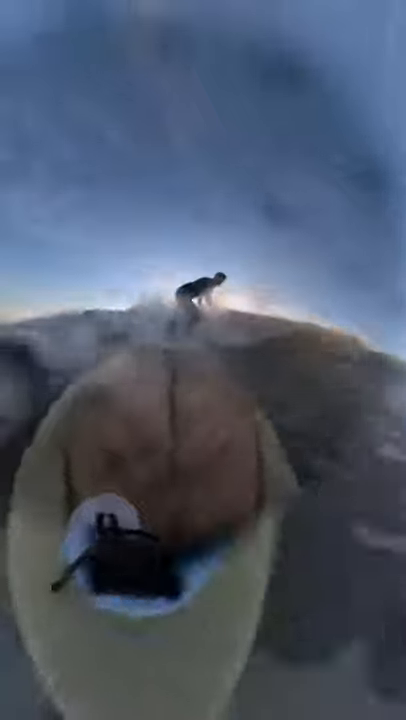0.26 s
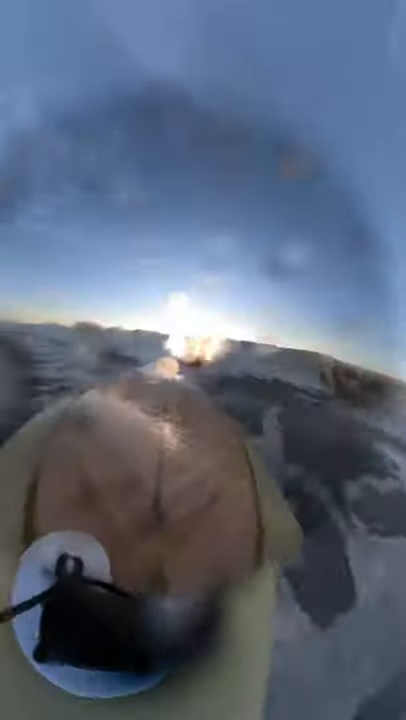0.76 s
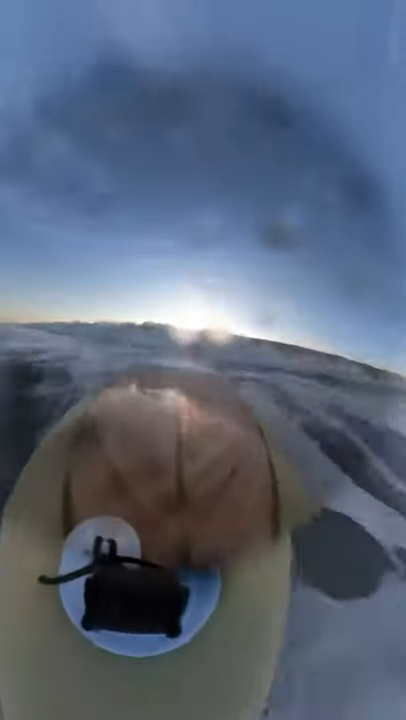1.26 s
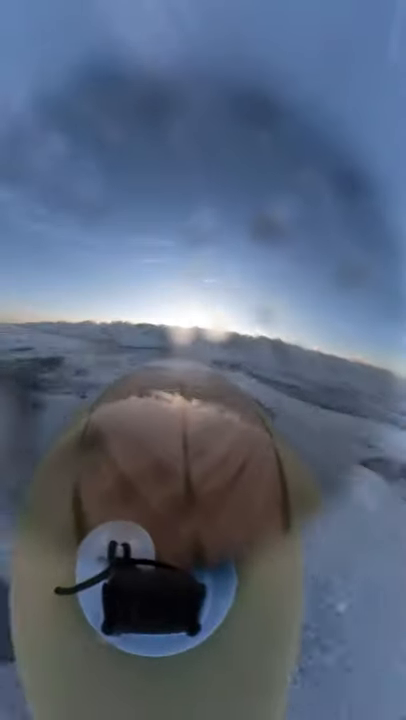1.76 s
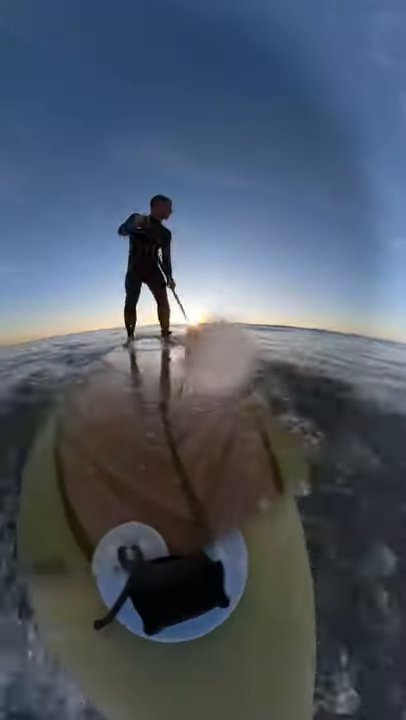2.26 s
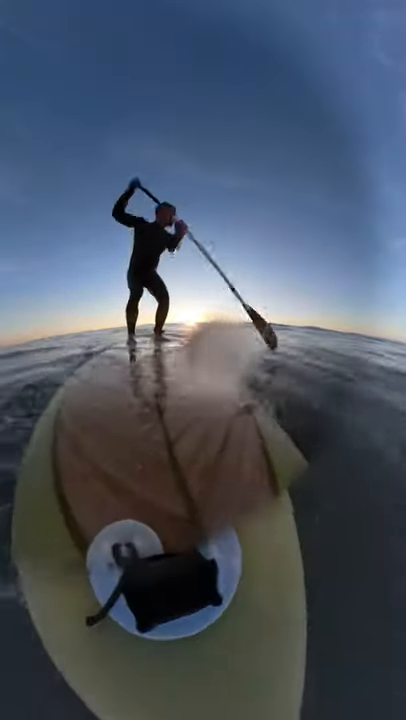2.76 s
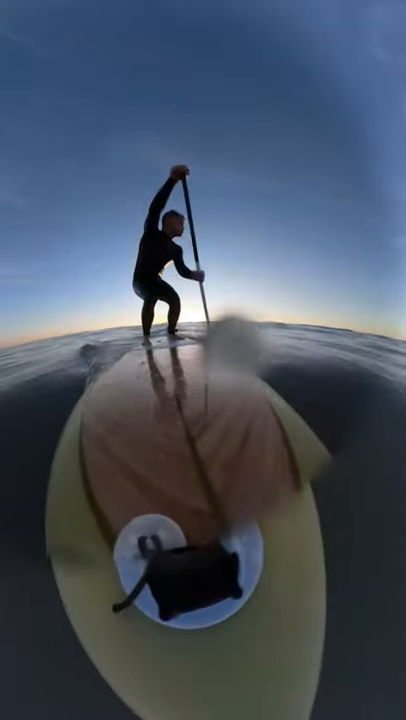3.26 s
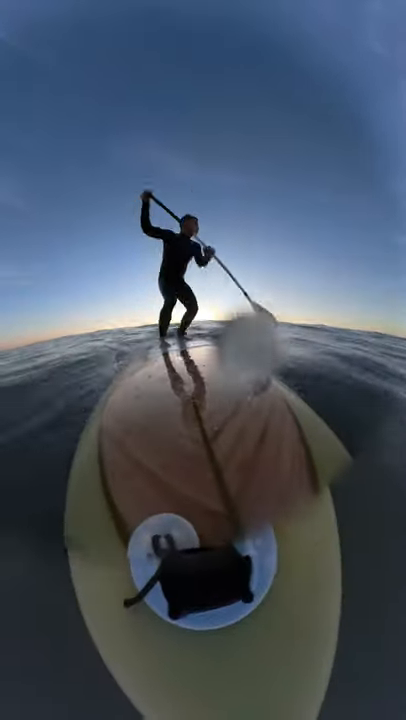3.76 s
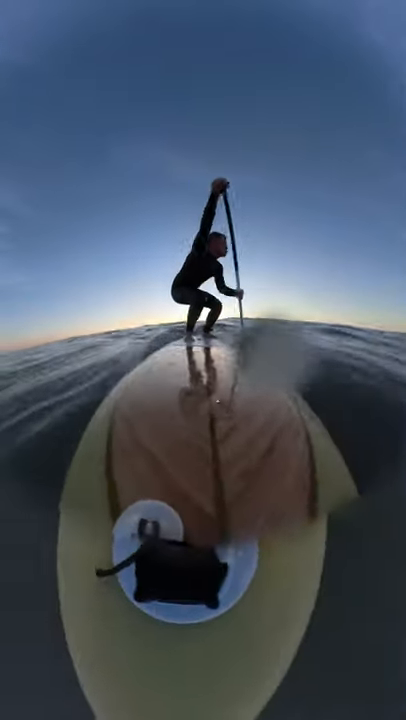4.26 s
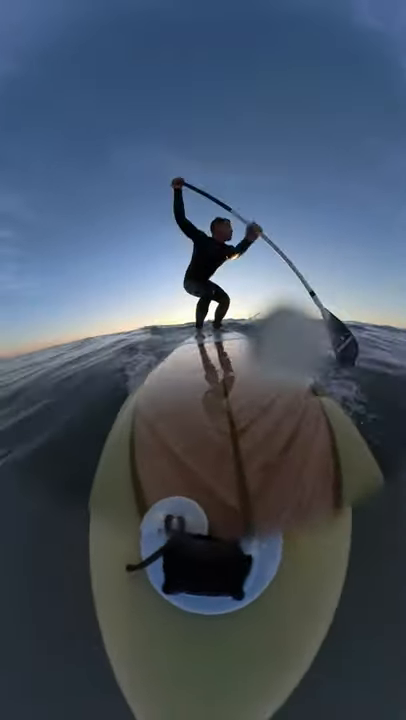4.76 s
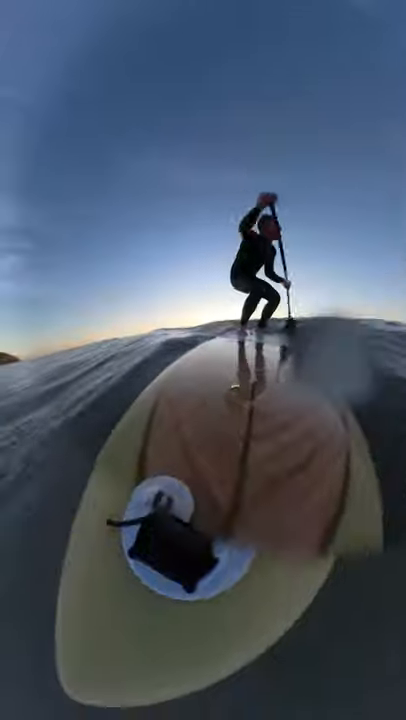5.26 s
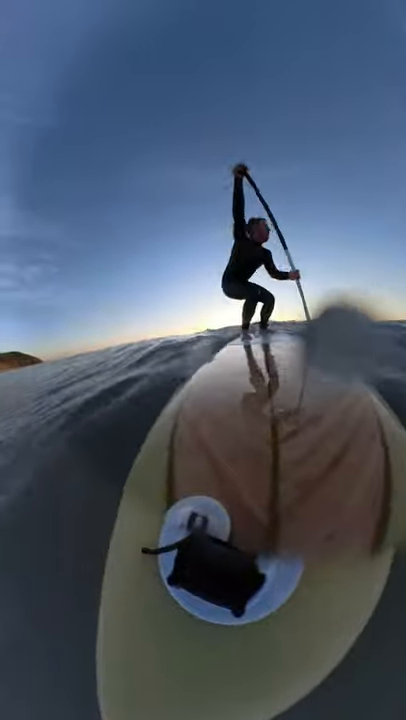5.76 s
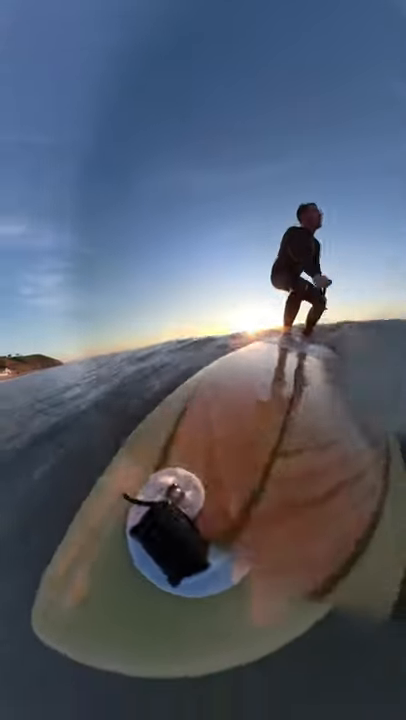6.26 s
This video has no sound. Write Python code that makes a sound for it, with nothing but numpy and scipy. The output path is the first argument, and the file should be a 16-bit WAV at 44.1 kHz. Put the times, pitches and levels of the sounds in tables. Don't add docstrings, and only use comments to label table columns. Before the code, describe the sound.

Outdoors on the sea, a sealed microphone sits on a paddle board's nose. From 0 to 2.2 s heavy low wind buffets and drums on the hollow hull, muffled by a water film, with dull knocks, gulping air pockets and rushing wash. Wet slaps with ringing drops come at about 0.87 and 1.1 s, then the water eases, with small laps near 1.7 and 2.05 s. At 2.18 s the sound falls nearly silent for a twentieth of a second, then opens with a click and a bright splash with hollow gulps; water drains hissing off the deck until about 2.8 s. Lighter wind follows, with irregular lapping, gurgles and drips, gusting around 3.7 and 4.6 s. A fuller wave surges at 5.24 s, wind strengthens, a deep gulp lands at 5.66 s, a sharp drop cracks at 5.83 s, and spray flurries from 6.14 s to the end. Distant breakers roar faintly throughout.

```python
import sys
import numpy as np
from scipy import signal
from scipy.fft import rfft, irfft, next_fast_len
from scipy.io import wavfile
from scipy.ndimage import uniform_filter1d, map_coordinates

SR = 44100
rng = np.random.default_rng(int(sys.argv[2]) if len(sys.argv) > 2 else 0)


def put_to_file(sound):
    columns = np.atleast_2d(sound).T
    safe = np.clip(columns, -1, 1)
    whole_steps = np.round(safe * 32767)
    wavfile.write(sys.argv[1], SR, whole_steps.astype(np.int16))


def invert_db(level):
    return 10 ** (np.asarray(level, dtype=float) / 20)


N = 286650
CUT_START_S, CUT_END_S = 2.1795, 2.2252


def unit(x):
    return x / np.sqrt(np.mean(x ** 2) + 1e-20)


def curves(rows):
    s, *columns = np.transpose(rows)
    return [np.interp(np.arange(N) / SR, s, column) for column in columns]


def wobble(rate_hz):
    knots = rng.standard_normal(int(N * rate_hz / SR) + 4)
    return map_coordinates(knots, [np.arange(N) * rate_hz / SR])


def filtered(x, response):
    size = next_fast_len(N + SR // 2)
    hz = np.fft.rfftfreq(size, 1 / SR)
    return irfft(rfft(x, size) * response(hz), size)[:N]


def colour(points):
    f, db = np.transpose(points)
    return lambda hz: invert_db(np.interp(np.log(hz + 1), np.log(f + 1), db))


def by_view(first, second):
    return np.where(np.arange(N) < (CUT_START_S + CUT_END_S) / 2 * SR, first, second)


def per_view(x, responses):
    first, second = (unit(filtered(x, r)) for r in responses)
    return by_view(first, second)


def swells(s, lift_db, length_s):
    step = 64
    t = np.arange(0, N + step, step) / SR
    since = t - s[:, None]
    width = np.where(since < 0, 0.52, 1) * np.abs(length_s)[:, None]
    bells = np.exp(-(since / width) ** 2)
    return np.interp(np.arange(N) / SR, t, lift_db @ bells)


def patchy(patchy_db):
    z = signal.stft(rng.standard_normal(N), nperseg=256)[2]
    field = uniform_filter1d(rng.standard_normal(z.shape), 4, 0)
    field = uniform_filter1d(field, 8, 1)
    return unit(signal.istft(z * invert_db(patchy_db * unit(field)), nperseg=256)[1][:N])


def bubbles(s, db, hz, cycles, rise, size):
    turns = np.arange(size) / SR * hz[:, None]
    life = turns / np.clip(cycles, .5, 40)[:, None]
    wave = np.sin(2 * np.pi * turns * (1 + rise * life))
    wave *= np.exp(-2 * life) * (1 - np.exp(-1.5 * turns)) ** 2
    wave *= np.cos(np.linspace(0, np.pi / 2, size))
    at = (s * SR).astype(int)[:, None] + np.arange(size)
    return np.bincount(at.ravel(), (invert_db(db)[:, None] * wave).ravel(), N + size)[:N]


def swarm(hz, octaves, cycles, spread_db, count, size):
    u, g = rng.random((count, 2)), rng.standard_normal(count)
    pitch = np.clip(hz * 2 ** (octaves * g), 80, 12000)
    db = -spread_db * np.log(1.004 - u[:, 1]) + 10 * np.log10(pitch / hz)
    return unit(bubbles(u[:, 0] * N / SR, db, pitch, np.full(count, cycles), rise=0.12, size=size))


def mix(noise, grains, share):
    share = np.clip(share, 0, 1)
    return np.sqrt(1 - share) * noise + np.sqrt(share) * grains


# frequency in Hz, level in dB per Hz.
SURF_COLOURS = [
    [(12, -36), (20, -12), (70, -7.5), (132, -0.5), (205, -6.5), (327, -0.5), (734, -22.5), (830, -22.5),
     (2560, -30.5), (7000, -82), (9100, -112), (15400, -120)],
    [(12, -33), (20, -3.5), (51, -10), (211, -12), (291, -13.5), (1170, -20), (1970, -27.5), (2170, -43.5),
     (5170, -60), (7500, -70), (9750, -102), (16500, -120)],
]


def surf():
    return invert_db(-42.5) * per_view(rng.standard_normal(N), map(colour, SURF_COLOURS))


# start in seconds, flow in dB, share thrown up as spray in dB.
FLOW_DRIFT = [(0.0, -36, -18), (0.44, -31, -22), (0.87, -37.5, -23), (1.31, -40, -22), (1.74, -38, -25.5),
              (2.18, -35, -20), (2.23, -29.5, -11.5), (2.62, -42.5, -26.5), (3.01, -41.5, -23.5),
              (3.39, -32.5, -20.5), (3.78, -36.5, -23.5), (4.17, -40, -16.5), (4.56, -37.5, -23),
              (4.95, -38, -21), (5.34, -44.5, -19), (5.72, -40.5, -24.5), (6.11, -38, -23),
              (6.5, -39, -25.5)]
# peak in seconds, lift in dB (negative in a lull),
# length in seconds, extra spray in dB.
WAVELETS = [(0.239, 6.0, 0.039, 7), (0.551, 0.5, 0.023, 6.5), (0.868, 5.5, 0.084, 6),
            (1.001, 4.5, 0.072, -0.5), (1.113, 10, 0.097, 5.5), (1.689, 7, 0.06, 3.7),
            (2.068, 4.5, 0.13, -1.7), (2.606, 7.5, 0.19, 2.5), (2.7, 5, 0.014, 4), (2.815, 4.3, 0.013, 7.3),
            (2.903, 4, 0.076, 3.5), (2.979, 8, 0.033, 3.5), (3.067, 5.5, 0.027, 8.5), (3.155, 0.5, 0.1, 9),
            (3.225, 7, 0.033, -2.6), (3.498, 3.5, 0.048, -1.5), (3.672, 2, 0.014, 3), (3.89, 2, 0.098, 5),
            (4.077, 6.5, 0.06, 1), (4.197, 6.5, 0.089, -4.2), (4.291, 4, 0.038, 0.5), (4.405, 4.5, 0.16, 3),
            (4.803, 4.5, 0.13, -2), (5.026, 4, 0.1, 2.5), (5.236, 12.5, 0.12, 2.7),
            (5.369, 5.5, 0.047, -4.5), (5.572, 1.5, 0.07, 4), (5.663, 0, 0.022, -4), (5.762, 7.5, 0.19, 8),
            (6.2, -2.5, 0.1, 6.5), (1.8, -2.5, .12, 2), (.3, -2.5, .04, 1), (.46, -2.5, .03, 1),
            (1.03, -2, .03, 1)]


def stream():
    usual_flow_db, usual_share_db = -35, -22
    flow_db, share_db = curves(FLOW_DRIFT)
    s, lift_db, length_s, extra_db = np.transpose(WAVELETS)
    flow_db = flow_db - usual_flow_db + swells(s, lift_db, length_s)
    return flow_db, share_db - usual_share_db + swells(s, extra_db, length_s)


# start in seconds, lift in dB
# (negative in a lull), length in seconds.
SPRAY_SLAPS = [(0.856, 7, 0.011), (.872, 11, 0.015), (1.109, 9.5, 0.029), (1.173, 6, 0.051),
               (2.252, 8.5, 0.019), (2.27, 11.5, 0.027), (2.342, 8.5, 0.017), (2.972, 9, 0.012),
               (3.144, 5.5, 0.019), (4.293, 1, 0.037), (4.356, 4.5, 0.021), (4.473, 6.5, 0.084),
               (6.137, 15.5, 0.021), (6.186, 8.5, 0.039), (6.27, 7.5, 0.023), (6.302, 10, 0.034),
               (6.338, 8, .012), (6.41, 8, 0.023), (3.295, 4, 0.08), (3.82, 3, .04), (1.68, 4.5, .025),
               (1.116, 0.5, .025), (2.225, -6, .02), (2.595, 10.5, 0.019), (2.382, 6, .012),
               (2.41, 4, .025), (2.436, -5, .035), (6.21, 4.5, .02), (6.245, -5, .025), (6.35, -4, .05),
               (1.195, 4.5, .035), (1.13, 2.5, .015), (2.515, -3.5, .04), (2.632, -4, .04), (2.74, -3, .05),
               (6.222, -2.5, .025), (3.53, 4, .07), (3.6, -4, .06), (3.92, 4, .04), (4.05, 3, .04),
               (5.84, 3, .06), (2.615, 4, .012)]


def slaps():
    s, db, length_s = np.transpose(SPRAY_SLAPS)[:, :, None]
    t = np.arange(SR // 5) / SR
    shape = db * (1 - np.exp(-t * 500)) * np.exp(-(t / length_s) ** 3)
    at = (s * SR).astype(int) + np.arange(len(t))
    return np.bincount(at.ravel(), shape.ravel(), N + SR)[:N]


LAYER_FOLLOWS = {"wash": (-34, -37, 1.225, -0.2051, -5.5), "rush": (-42, -43.5, 1.01, 0.14, 4),
                 "spray": (-57, -57, 0.8, 0.8754, -5), "mist": (-76, -68, 0.9, 0.55, 2.5)}


def layer_levels():
    drain_peak_s, drain_s = 2.434, 0.28
    flow_db, share_db = stream()
    since = np.arange(N) / SR - drain_peak_s
    draining = by_view(0, np.exp(-(since / drain_s) ** 2))
    return [by_view(first, second) + grow * flow_db + bright * share_db + drain_db * draining
            for first, second, grow, bright, drain_db in LAYER_FOLLOWS.values()]


# frequency in Hz, level in dB per Hz.
WASH_COLOURS = [
    [(71, -32), (120, -6.5), (236, -13), (478, -19), (525, -19), (900, -28.5), (1170, -49.5), (1980, -120)],
    [(71, -33), (120, 1.5), (188, -10.5), (286, -7), (314, -4), (900, -12), (1170, -40), (1980, -120)],
]
RUSH_COLOURS = [
    [(440, -29.5), (750, -7), (939, -5.5), (1090, -3), (1700, -12.5), (2300, -20.5), (2990, -39),
     (5060, -120)],
    [(440, -9), (750, -6.5), (944, -3), (1190, -2), (1920, -9), (2300, -30.5), (2990, -48), (5060, -120)],
]
SPRAY_COLOURS = [
    [(1120, -47.5), (1900, 0.5), (2660, 1), (3450, -13), (4400, -30.5), (5720, -56.5), (9680, -120)],
    [(1120, -33), (1900, -6), (1990, -5), (2160, -9), (2710, -7), (3200, -15), (4400, -24), (5720, -59),
     (9680, -120)],
]
MIST_COLOURS = [
    [(2290, -23), (3900, -2.5), (4350, -2.5), (5090, 4), (5830, -11), (6470, -11), (7720, -30),
     (10000, -70), (17000, -120)],
    [(2290, -28.5), (3900, -7.5), (4490, -10.5), (4930, -2), (5530, -4), (5880, -4.5), (7150, -23.5),
     (7720, -21.5), (10000, -48.5), (17000, -120)],
]


def water():
    wash_db, rush_db, spray_db, mist_db = layer_levels()
    lift_db = slaps()
    churn_db = .4 * wobble(14) + .85 * wobble(45) + .55 * wobble(130)
    gurgle = swarm(600, 1.2, 3.5, spread_db=2.5, count=5000, size=1000)
    prickle = swarm(4000, .7, 5, spread_db=3.2, count=9000, size=250)
    body = mix(patchy(patchy_db=.6), gurgle, share=.04)
    fizz = mix(patchy(patchy_db=.9), prickle, share=.15)
    out = invert_db(wash_db + 0.19 * lift_db) * per_view(invert_db(1.6 * churn_db) * body, map(colour, WASH_COLOURS))
    out += invert_db(rush_db + 0.52 * lift_db) * per_view(invert_db(0.48 * churn_db) * body, map(colour, RUSH_COLOURS))
    out += invert_db(spray_db + lift_db) * per_view(invert_db(0.72 * churn_db) * fizz, map(colour, SPRAY_COLOURS))
    return out + invert_db(mist_db + lift_db) * per_view(invert_db(1.4 * churn_db) * fizz, map(colour, MIST_COLOURS))


# start in seconds, peak in dB.
PINPRICKS = [(0.3121, -68), (0.3306, -67), (0.7866, -70), (0.9307, -72), (0.9547, -69), (1.2989, -76),
             (1.3173, -68), (1.3787, -76), (1.3947, -67), (2.3779, -80), (4.341, -77), (5.8196, -74),
             (5.8326, -62), (5.8454, -66), (5.872, -70), (5.8774, -71), (5.8824, -75), (6.1439, -70),
             (6.1768, -71), (6.2277, -68), (6.2866, -68)]
# frequency in Hz, level in dB per Hz.
PINPRICK_COLOUR = [(5500, -40), (7500, -3), (10500, 0), (13500, -4), (16000, -40)]


def pinpricks():
    s, db = np.transpose(PINPRICKS)
    clicks = np.bincount((s * SR).astype(int), invert_db(db + 5.0), N)[:N]
    burst = rng.standard_normal(90) * invert_db(-np.arange(90) / SR * 9000)
    return filtered(np.convolve(clicks, burst)[:N], colour(PINPRICK_COLOUR))


# start in seconds, peak in dB,
# pitch in Hz.
SINGLE_DROPS = [(.853, -42.5, 2790), (.888, -34.5, 3200), (1.112, -34, 3000), (1.118, -42, 2540),
                (1.127, -29, 3500), (1.685, -41, 2850), (2.2468, -40, 2420), (2.4264, -40, 2620),
                (2.4763, -47, 2420), (2.6803, -41, 2520), (2.809, -38.5, 2320), (2.9744, -40, 2770),
                (3.059, -42, 2720), (3.1428, -43, 2820), (3.444, -40, 2790), (3.6731, -41, 2740),
                (5.214, -32.5, 2650), (5.8326, -26, 2430), (6.1335, -43, 2690), (6.286, -41, 3370),
                (2.3067, -40, 4170), (2.3316, -45, 3950), (2.352, -42, 3400), (2.5735, -49, 3500),
                (2.6189, -49, 3000), (3.5874, -46, 3750), (3.8329, -47, 3560), (3.9247, -45, 4180),
                (4.4929, -46, 3730), (5.2028, -46, 3880), (5.75, -44, 4200), (6.2719, -43, 2650),
                (6.4071, -47, 2760), (5.872, -42, 2500), (1.2, -44, 3100),
                (.861, -42, 5130), (.866, -42, 4200), (.882, -42, 4300), (.877, -43.5, 5400),
                (1.1103, -49, 5570), (2.2248, -47.5, 4900), (2.2358, -46, 5400), (2.2533, -39, 5960),
                (2.4142, -38, 5250), (2.3875, -49, 5510), (2.385, -55, 7800), (2.3605, -51, 5800),
                (2.346, -58, 7000), (2.4275, -50, 4700), (2.5095, -52, 5240), (2.5655, -56, 5800),
                (2.332, -48, 5400), (5.0366, -50, 4940), (5.4357, -50, 5290), (4.6365, -55, 5010),
                (6.3115, -57, 6200), (6.187, -53, 5300), (3.538, -52, 6000), (2.5892, -49, 5700),
                (2.591, -53, 6400), (2.7204, -46, 6160), (2.8985, -50, 5030), (2.9662, -51, 4720),
                (2.9796, -49, 5040), (3.2131, -51, 4900), (3.229, -48, 4600), (3.2944, -49, 4730),
                (3.7135, -51, 4850), (4.0864, -47, 4750), (4.372, -55, 4830), (5.8233, -50, 5370),
                (5.8334, -32.5, 4900), (6.145, -42, 5470), (6.1715, -42, 5040)]


def drops():
    s, db, hz = np.transpose(SINGLE_DROPS)
    return invert_db(7.5) * bubbles(s, db, hz, 3.5 + 0.0011 * hz, rise=0.01, size=400)


# start in seconds, peak in dB, 60 dB decay time in seconds.
HARD_DROPS = [(2.2362, -31, 0.0037), (5.8342, -12, 0.00096), (6.146, -31, 0.004), (6.1716, -38, 0.0037),
              (2.387, -40, .005), (2.589, -40, .004), (5.823, -40, .005), (3.6702, -42, .004)]
# frequency in Hz, level in dB per Hz.
HOUSING_COLOUR = [(1180, -18), (2000, 1), (2250, -12), (3290, 2.5), (5110, -16.5), (6090, -29), (6740, -10),
                  (7720, -18.5), (10000, -53), (17000, -120)]


def snaps():
    cracks, t = np.zeros(N), np.arange(600) / SR
    for s, db, t60 in HARD_DROPS:
        decay = invert_db(db + 7.0 - 60 * t / t60)
        cracks[round(s * SR):][:len(t)] += decay * rng.standard_normal(len(t))
    return filtered(cracks, colour(HOUSING_COLOUR))


# start in seconds, peak in dB, pitch in Hz, life in cycles.
AIR_POCKETS = [(0.496, -24, 289, 5.6), (0.724, -19, 380, 4.6), (0.777, -15, 334, 2.1), (0.86, -19, 650, 5),
               (1.104, -9.5, 526, 5), (1.184, -19.5, 666, 10), (1.54, -20, 348, 3.8),
               (1.833, -22.5, 400, 7.8), (2.247, -8, 970, 4.8), (2.854, -27, 464, 6.9),
               (2.974, -26, 546, 4.1), (3.166, -24.5, 427, 9.7), (3.329, -20, 394, 6.4),
               (4.265, -21, 366, 3.4), (4.545, -22.5, 859, 9.5), (5.031, -15.5, 294, 3.3),
               (5.254, -17.5, 470, 9.1), (5.373, -18, 664, 3.5), (5.664, -10.5, 346, 2.8),
               (5.702, -22, 412, 4.1), (5.851, -18.5, 295, 9.1), (5.915, -13, 274, 4),
               (6.136, -17, 1090, 5.5), (.236, -17.5, 640, 7), (.406, -18.5, 780, 9), (.551, -18.5, 614, 7),
               (1.538, -21, 560, 4), (1.69, -19, 580, 6), (2.046, -20, 603, 4), (2.268, -14, 816, 5),
               (2.293, -15, 950, 4), (2.586, -20, 921, 5), (2.695, -19, 746, 4), (2.329, -19, 700, 5),
               (3.219, -17, 673, 5), (3.403, -18, 923, 4), (3.521, -21, 659, 4), (3.591, -19, 484, 4),
               (3.87, -20, 546, 4), (4.205, -17, 684, 4), (2.42, -25, 1500, 6), (4.462, -19, 589, 4),
               (4.725, -20, 711, 4), (5.739, -21, 571, 4), (2.35, -22, 1150, 6), (.872, -17, 720, 5)]


def gulps():
    return invert_db(0.5) * bubbles(*np.transpose(AIR_POCKETS), rise=0.0084, size=1500)


# start in seconds, peak in dB, pitch in Hz, life in cycles.
HULL_KNOCKS = [(.255, -22, 300, 6), (.4, -22, 420, 7), (.612, -22, 420, 5), (.665, -20, 250, 5),
               (.72, -22, 200, 4), (.775, -21, 170, 5), (3.484, -22, 365, 9), (3.68, -21, 140, 5),
               (4.04, -29, 160, 8), (4.365, -22, 190, 6), (4.41, -26, 205, 7), (4.475, -27, 200, 8),
               (5.655, -25, 150, 5), (1.39, -28, 450, 4), (5.93, -24, 380, 5), (6.03, -26, 400, 5),
               (1.62, -25, 300, 5)]


def thuds():
    return invert_db(5.5) * bubbles(*np.transpose(HULL_KNOCKS), rise=-.01, size=4000)


# peak in seconds, lift in dB, length in seconds.
GUSTS_AND_LULLS = [(0.098, -2, 0.032), (0.188, -8, 0.054), (0.32, -1, .066), (0.45, -12, .031),
                   (0.745, -4, 0.063), (0.862, 3, 0.026), (1.095, 4.5, .055), (1.397, 3, .03),
                   (1.514, -9, .19), (1.736, 1.5, 0.038), (2.063, 9, 0.026), (2.424, 4.5, 0.15),
                   (2.724, -8, 0.032), (2.898, -4, .06), (3.168, -5, .06), (3.415, 3, 0.047),
                   (3.593, 7, 0.034), (3.716, 8.5, 0.078), (4.036, -8, .055), (4.385, 1, .2),
                   (4.592, 9.5, .044), (4.71, 8, 0.032), (4.818, -8, 0.033), (5.067, 3, .054),
                   (5.13, -10, .037), (5.188, 6, 0.03), (5.323, -7.5, .054), (5.493, -8.5, 0.062),
                   (5.635, -13, 0.063), (6.268, -5, 0.027)]


def gusts():
    return swells(*np.transpose(GUSTS_AND_LULLS))


# peak in seconds, lift in dB, length in seconds.
HULL_BOOMS = [(.023, -12.5, 0.24), (.302, 9.5, 0.12), (.47, -6, 0.14), (.69, 2, 0.047), (.855, 7, .051),
              (1.093, 6, .086), (1.52, -9.5, 0.11), (1.753, 10.5, 0.16), (2.267, 8.5, .12),
              (3.68, 4.5, 0.022), (4.4, 2.5, 0.11), (4.658, -5.5, .2), (5.482, -9, 0.089),
              (5.614, -7, 0.035), (5.89, 4.5, 0.081), (6.163, -15, .14), (6.371, -1.5, 0.093)]


def hull_level(gust_db):
    t = np.arange(N) / SR
    drift_db = by_view(-26 - 2.5 * t, -39 + 1.82 * (t - CUT_END_S))
    return drift_db + swells(*np.transpose(HULL_BOOMS)) + .1 * gust_db + 0.3 * stream()[0]


# frequency in Hz, width in Hz.
HULL_MODES = [
    (50, 31),
    (190, 116),
]


def hull_drum(gust_db):
    modes = [lambda f, c=c, w=w: (1j * f * w / (c * c - f * f + 1j * f * w)) ** 2 for c, w in HULL_MODES]
    drum = per_view(rng.standard_normal(N), modes)
    drum /= uniform_filter1d(np.abs(drum), size=5000) ** 0.4
    return invert_db(hull_level(gust_db)) * unit(drum)


# time in seconds, level in dB.
WIND_STRENGTH = [(0, -26), (.44, -18), (.87, -20), (1.31, -21), (1.74, -25), (2.18, -28), (2.23, -37),
                 (2.62, -37.5), (3.01, -41.5), (3.39, -41), (3.78, -33), (4.17, -35), (4.75, -40.5),
                 (5.34, -26.5), (5.8, -27), (6.125, -32), (6.145, -17.5), (6.5, -23)]
# frequency in Hz, level in dB per Hz.
BUFFET_COLOURS = [
    [(8.8, -40), (15, -14), (38, 1.5), (54, -1), (120, -5.5), (166, -16), (220, -19.5), (290, -32.5),
     (480, -120)],
    [(8.8, -43.5), (15, -6.5), (32, 0), (47, 1.5), (108, -8.5), (135, -20), (150, -15), (200, -53.5),
     (330, -120)],
]


def buffeting(gust_db):
    swing = invert_db(2.3 * wobble(18)) * rng.standard_normal(N)
    swing = per_view(swing, map(colour, BUFFET_COLOURS))
    swing /= uniform_filter1d(np.abs(swing), size=3500) ** 0.93
    return invert_db(curves(WIND_STRENGTH)[0] + gust_db) * unit(swing)


def wind():
    top, knee = .4, 3.6
    gust_db = gusts()
    low = buffeting(gust_db) + hull_drum(gust_db)
    return low / (1 + np.abs(low / top) ** knee) ** (1 / knee)


# frequency in Hz, gain in dB.
MEMBRANE_GAIN = [(7600, 0), (9200, -12.5), (12000, -44)]


def membrane(x):
    return filtered(x, colour(MEMBRANE_GAIN))


def scene():
    splashes = drops() + snaps() + gulps() + thuds()
    return (membrane(surf() + water() + splashes + wind()) + pinpricks())[None]


def top_cut(x):
    return signal.sosfilt(signal.butter(12, 14200, fs=SR, output="sos"), x)


def record(dry):
    t = np.arange(N) / SR
    since = t - CUT_START_S
    first = np.clip(-since / .0008, 0, 1)
    tail = invert_db(-28.5 - 690 * since) * (since > 0) * (since < .031)
    second = t > CUT_END_S
    hiss = invert_db(-104) * rng.standard_normal(N)
    click = invert_db(-26 - 11000 * np.abs(t - CUT_END_S)) * second
    return top_cut(click + (dry + hiss) * (first + tail + second))


dry = scene()
out = record(dry)
put_to_file(out)
```